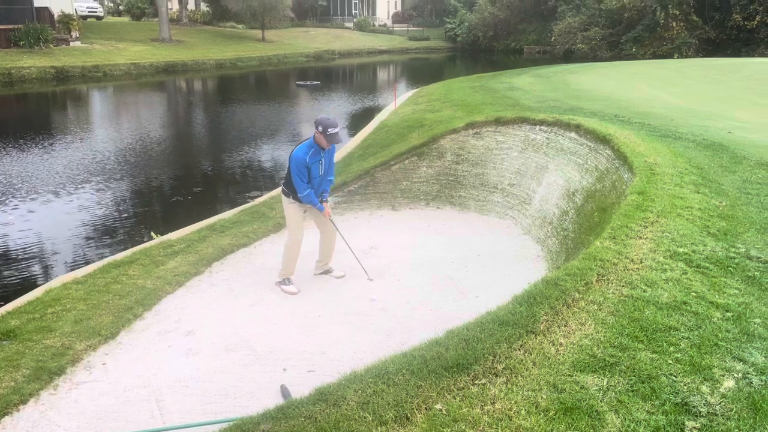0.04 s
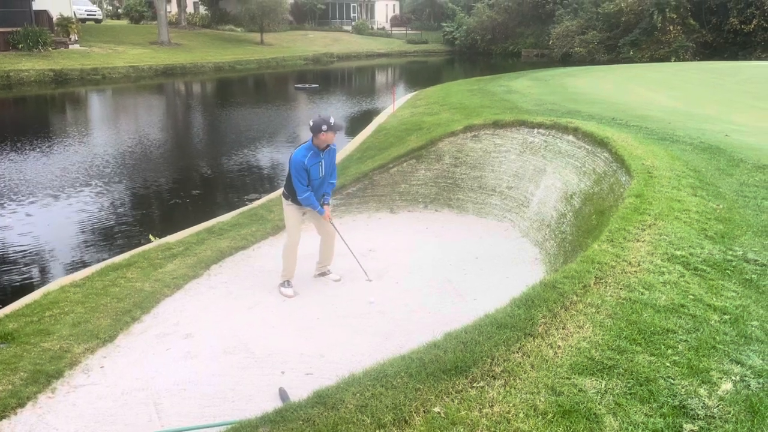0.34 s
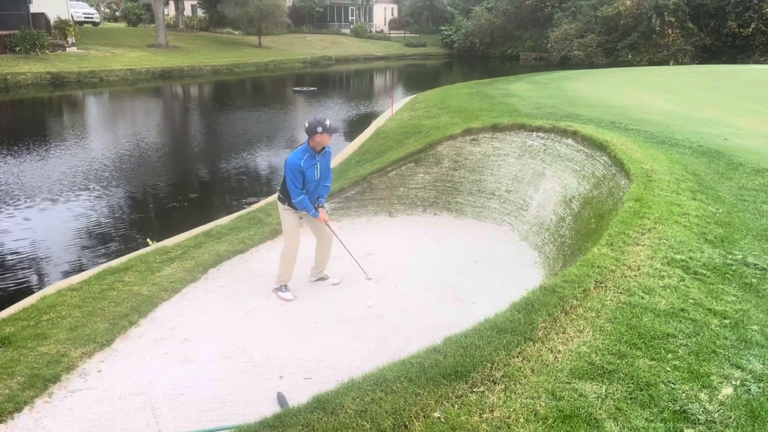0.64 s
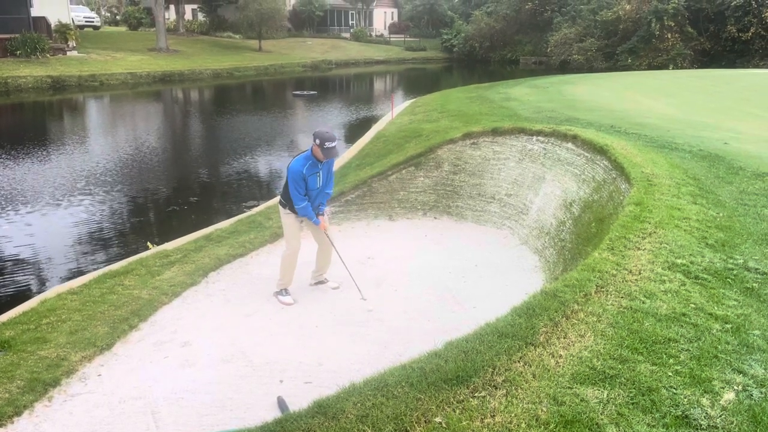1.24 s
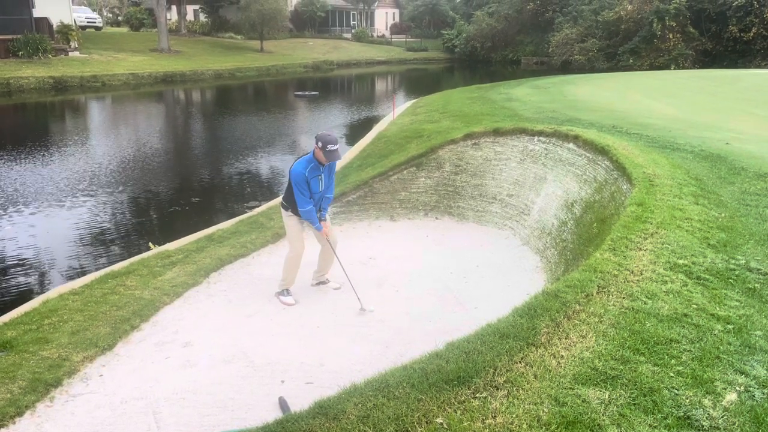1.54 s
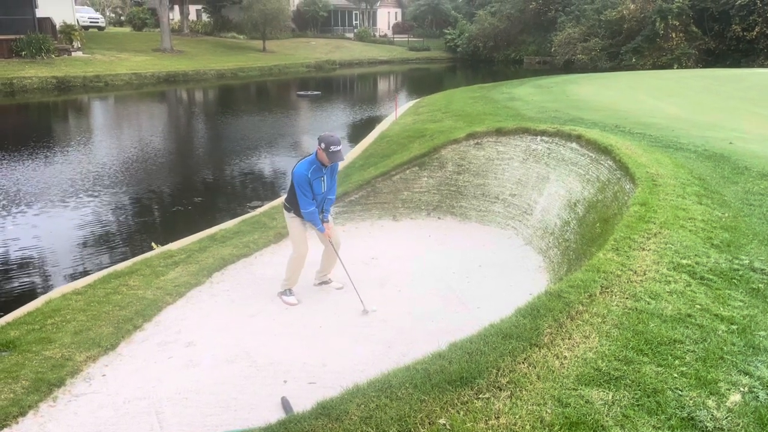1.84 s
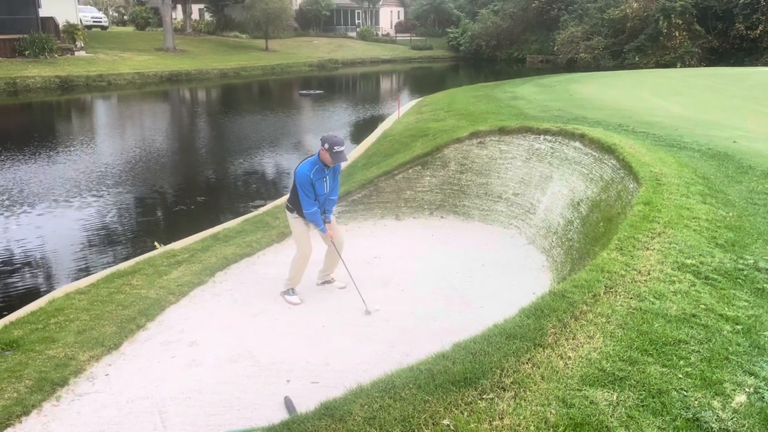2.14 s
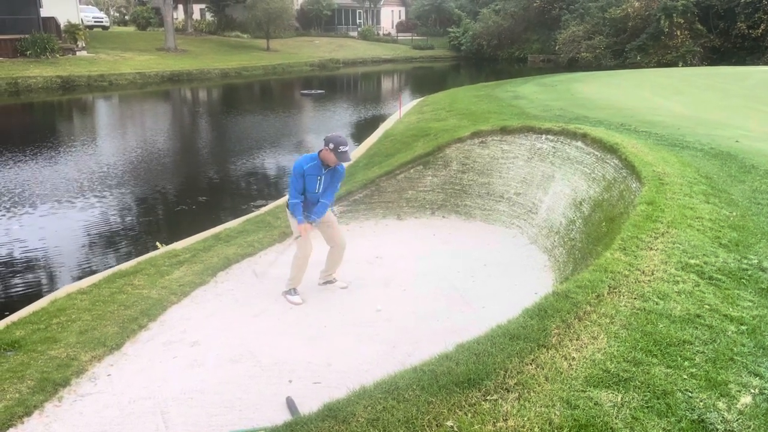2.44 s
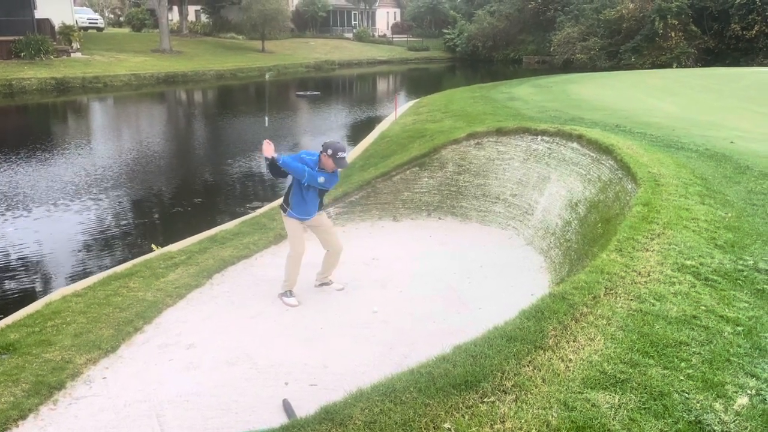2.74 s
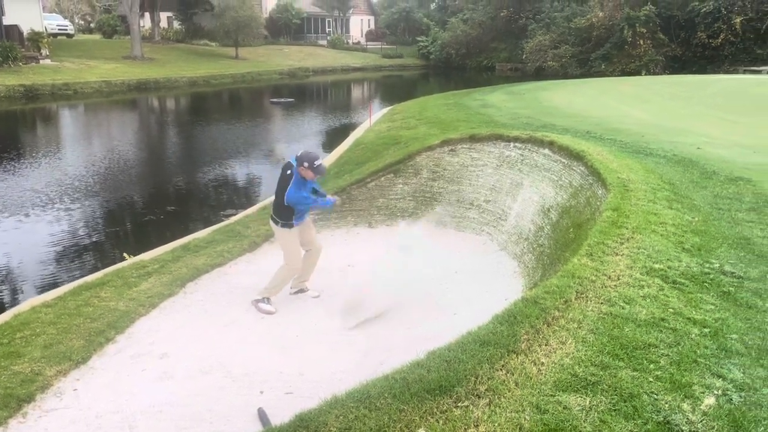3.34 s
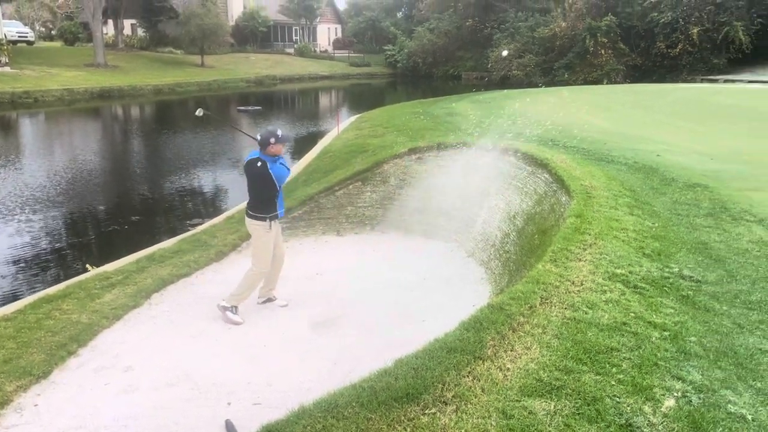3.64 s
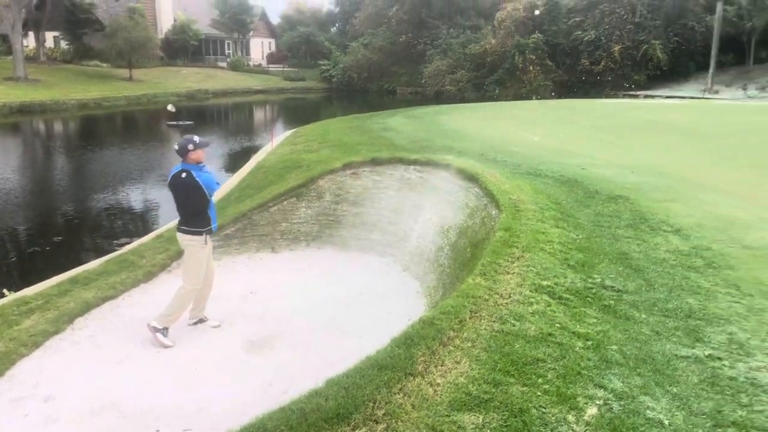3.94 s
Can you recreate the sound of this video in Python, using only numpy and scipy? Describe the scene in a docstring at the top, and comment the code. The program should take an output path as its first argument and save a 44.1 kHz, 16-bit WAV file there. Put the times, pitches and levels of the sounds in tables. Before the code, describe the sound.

A golf club strikes bunker sand once, near the end, with a sharp crack, crunch and dull thud, then a faint hiss of falling sand. Before it, a breeze bumps the microphone over distant traffic, small ticks and faint chirps.

```python
"""A golf bunker beside a pond. Far traffic and trees make a steady wash, a low drone swells, a far bird
chirps, and a breeze rumbles and bumps on the microphone. A few small ticks sound close by. The golfer's
shoes shuffle faintly, then the club cracks into the sand and crunches through it with a dull thud, and
the thrown sand hisses down. Air and cracks are shaped noise, sand is a stream of tiny random clicks,
and the clack, thud, bumps, ticks and chirps are short sine tones."""
import sys
import numpy as np
from scipy import signal
from scipy.fft import rfft, irfft
from scipy.io import wavfile

SR = 44100
rng = np.random.default_rng(int(sys.argv[2]) if len(sys.argv) > 2 else 0)


def pcm_store(signal):
    """Save signal as 16-bit PCM."""
    levels = np.round(np.clip(np.atleast_2d(signal), -1, 1) * 32767)
    wavfile.write(sys.argv[1], SR, levels.astype(np.int16).T)


N = 176400
T = np.arange(N) / SR
FREQS = np.maximum(np.fft.rfftfreq(N, 1 / SR), 1)


def from_db(db):
    """Decibels to gain."""
    return 10 ** (np.asarray(db) / 20)


def fader(rows):
    """A gain ride through points of time_s, level_db."""
    return from_db(np.interp(T, *np.transpose(rows)))


def over_hz(points):
    """Points of freq_hz, value joined along a log frequency axis."""
    hz, value = np.transpose(points)
    return np.interp(np.log(FREQS), np.log(hz), value)


def drift(rate_hz):
    """A random wobble with spread 1, mostly slower than rate_hz."""
    slow = irfft(rfft(rng.standard_normal(N)) / (1 + (FREQS / rate_hz) ** 2), N)
    return slow / slow.std()


def swell(centre_s, half_s):
    """A bell-shaped fade in and out."""
    return np.exp(-np.minimum(((T - centre_s) / half_s) ** 2 / 2, 50))


def struck(start_s, modes):
    """Decaying sines set off together, in alternating polarity."""
    age = np.clip(T - start_s, 0, 1)
    return sum((-1) ** k * from_db(db - 60 * np.minimum(age / t60, 4)) * np.sin(2 * np.pi * hz * age)
               for k, (hz, db, t60) in enumerate(modes))


# Stereo width of the noise layers: freq_hz, left_right_correlation
STEREO_WIDTH = [(60, 0.83), (250, 0.78), (500, 0.47), (900, 0.11), (1700, 0.44), (3500, 0.4), (5200, 0.49),
                (6400, -0.48), (7400, -1.026), (8000, -0.95), (9000, -0.23), (10800, 1), (12200, 0.86),
                (13800, -1)]
# Their lean to one side: freq_hz, left_minus_right_db
STEREO_PAN = [(100, -0.5), (250, -1.5), (600, 2.5), (2000, 2.5), (8000, 0)]
def coloured(white, spectrum):
    """Two unrelated white signals, as mid and side, become a stereo pair with this spectrum."""
    alike = np.clip(over_hz(STEREO_WIDTH), -1, 1)
    mid, side = rfft(white)
    sides = np.array([[1], [-1]])
    pair = np.sqrt(1 + alike) * mid + sides * np.sqrt(1 - alike) * side
    eq = from_db(over_hz(spectrum) + sides * over_hz(STEREO_PAN) / 2)
    return irfft(pair * eq, N) * np.sqrt(SR) / 2


def noise(spectrum):
    """Smooth stereo noise."""
    return coloured(rng.standard_normal((2, N)), spectrum)


def grains(per_s, spread_db, spectrum):
    """Sand grains of uneven size collide at random, one click each."""
    sizes = from_db(spread_db * np.minimum(rng.exponential(1, (2, N)), 4))
    clicks = sizes * rng.choice([-1, 1], (2, N)) * (rng.random((2, N)) < per_s / SR)
    return coloured(clicks / clicks.std(), spectrum)


# Dark tone of the background bed: freq_hz, density_db
WASH_TONE = [(20, -105), (40, -86), (65, -72.5), (200, -70.5), (400, -73.5), (530, -78.5), (660, -77),
             (850, -74), (1000, -78), (1150, -82.5), (1560, -81), (1800, -87), (2800, -94), (4000, -100),
             (6000, -106), (8500, -112), (10500, -119), (12500, -130), (15000, -150)]
# Its fader ride: time_s, gain_db
WASH_RIDE = [(0, -2), (.5, -2), (.72, -1.5), (.77, -5.5), (.82, -0.5), (.88, -1), (1.1, -0.76), (2.2, -1.5),
             (3.2, -1), (4, -1.5)]
def wash():
    """Far traffic and trees blur into a bed that barely wavers."""
    return noise(WASH_TONE) * fader(WASH_RIDE) * from_db(0.48 * drift(rate_hz=25))


# One narrow bass peak: freq_hz, density_db
DRONE_TONE = [(30, -120), (56, -74.5), (68, -51), (82, -64.5), (200, -115), (600, -170)]
# Its swell in the second half: time_s, gain_db
DRONE_RIDE = [(0, -16.5), (2.1, -12), (2.4, 0), (2.8, -1.5), (3.3, 3.5), (3.65, -4.5), (4, -15)]
def drone():
    """A deep, wavering drone far away."""
    return noise(DRONE_TONE) * fader(DRONE_RIDE)


# Partials of the call: centre_s, half_length_s, pitch_hz, relative_db
BIRD_PARTIALS = [(1.387, .008, 4480, -61), (1.386, .008, 3850, -63), (1.402, .007, 3020, -59),
                 (1.4, .011, 6100, -71), (1.655, .009, 2400, -63), (1.762, .009, 2720, -62),
                 (1.757, .009, 3300, -67)]
def bird(gain_db=6.5, fall_hz_per_s=3700, rough_rad=1.35):
    """A far bird chirps in short, slightly falling partials, roughened by phase jitter."""
    out = np.zeros((2, N))
    for s, half, hz, db in BIRD_PARTIALS:
        phase = 2 * np.pi * np.cumsum(hz - fall_hz_per_s * (T - s)) / SR
        level = from_db(gain_db + db) * swell(s, half)
        for channel in range(2):
            out[channel] += level * np.sin(phase + rough_rad * drift(rate_hz=360))
    return out


# Low end of the breeze: freq_hz, density_db
BREEZE_TONE = [(18, -103), (35, -72), (52, -56), (70, -61), (100, -59.5), (150, -68), (260, -75.5),
               (500, -90.5), (2500, -160)]
# Its gusts and lulls: time_s, gain_db
BREEZE_RIDE = [(0, -8.5), (.12, -3.5), (.3, -17), (.78, -18), (1, -8), (1.65, -6.5), (2.15, -3.5),
               (2.3, -1.5), (2.5, -3.5), (2.7, 1), (3.3, -3), (3.5, -4.5), (4, -1.5)]
# Boomy tone of a buffet of air: freq_hz, density_db
BUFFET_TONE = [(20, -88), (55, -59.5), (120, -57), (200, -67), (280, -62.5), (400, -76), (600, -101),
               (3000, -160)]
# Buffet cues: centre_s, half_length_s, gain_db
BUFFET_CUES = [(0.055, 0.035, -2.5), (0.166, 0.021, -3.5), (0.226, 0.01, -3), (0.419, 0.023, -2),
               (1.021, 0.017, -7.5), (1.277, 0.028, -6.5), (1.467, 0.0184, -4.5), (1.742, 0.011, -7),
               (1.905, 0.082, -13), (2.375, 0.035, -10)]
def wind():
    """The breeze on the microphone makes a lumpy rumble with short buffets on top."""
    rumble = noise(BREEZE_TONE) * fader(BREEZE_RIDE) * from_db(0.23 * drift(rate_hz=21))
    buffets = sum(from_db(db) * swell(s, half) for s, half, db in BUFFET_CUES)
    return rumble + noise(BUFFET_TONE) * buffets


# Soft bumps of the breeze, then two after-thumps of the club's thud: centre_s, half_length_s, pitch_hz,
# level_db
BUMP_CUES = [(0.053, 0.0017, 238, -26.5), (0.189, 0.0036, 214, -27), (0.217, 0.0032, 200, -33),
             (0.415, 0.0025, 150, -40), (0.427, 0.0052, 167, -38.5), (1.265, 0.0074, 130, -36),
             (1.297, 0.0057, 200, -38.5), (1.453, 0.0024, 150, -33.5), (1.48, 0.0046, 180, -28),
             (1.874, 0.0024, 220, -33), (1.907, 0.0026, 159, -30), (1.975, 0.0021, 250, -34.5),
             (2.249, .004, 131, -36), (3.309, 0.0062, 166, -35), (3.331, 0.0029, 153, -32.5)]
def bumps():
    """Each bump sounds for a few rounded cycles: the breeze rocks the microphone, and the last two thump after
    the thud of the shot."""
    return sum(from_db(db) * swell(s, half) * np.sin(2 * np.pi * hz * (T - s))
               for s, half, hz, db in BUMP_CUES)


# Ring of a case under a knock: pitch_hz, relative_db, t60_s
CASE_MODES = [(1540, -9, 0.0085), (4200, -6, 0.0039)]
def knock(start_s, hz, pitch_halving_s=0.00053, rise_s=0.00016, t60_s=0.013):
    """A damped pop whose pitch dives at once, with a brief ring of the case."""
    age = np.clip(T - start_s, 0, 4 * t60_s)
    phase = 2 * np.pi * hz * pitch_halving_s * np.log1p(age / pitch_halving_s)
    pop = np.sin(phase) * from_db(-60 * age / t60_s)
    return (pop + struck(start_s, CASE_MODES)) * (1 - np.exp(-age / rise_s))


# Bright snap of a tick: pitch_hz, relative_db, t60_s
SNAP_MODES = [(5570, 0, 0.0027), (8550, 1.5, 0.0021), (11700, -5.5, 0.0012)]
# Tick cues: start_s, knock_db, snap_db, left_lag_ms, knock_start_hz, lowpass_hz
TICK_CUES = [(0.7687, -25, -43, 0.082, 1880, 11400), (1.101, -32.5, -48.5, 0.15, 3200, 15000),
             (3.3238, -62, -56, 0.021, 1900, 15000), (3.788, -60, -54, 0.092, 1900, 15000),
             (3.8253, -55, -39.5, 0.2, 1900, 15000)]
def ticks():
    """Each close tick is a short knock and a snap, reaching the right side first."""
    out = np.zeros((2, N))
    for s, knock_db, snap_db, lag_ms, hz, lowpass_hz in TICK_CUES:
        lowpass = signal.butter(6, lowpass_hz, fs=SR, output="sos")
        for channel, start in enumerate((s + lag_ms / 1000, s)):
            tick = from_db(knock_db) * knock(start, hz) + from_db(snap_db) * struck(start, SNAP_MODES)
            out[channel] += signal.sosfilt(lowpass, tick)
    return out


# Thin grit under the shoes: freq_hz, density_db
SHUFFLE_TONE = [(1500, -125), (2800, -103), (4200, -101), (5500, -110), (8000, -120), (12000, -128),
                (15000, -155)]
# Two spells of footwork: time_s, gain_db
SHUFFLE_RIDE = [(0, -1.5), (.25, -0.5), (.45, -1.5), (.7, 1), (.85, -1), (1.1, -28), (1.7, -5), (2.1, -15)]
def shuffle():
    """Shoes rustle faintly in the sand as the golfer digs in his stance."""
    return grains(per_s=7500, spread_db=5, spectrum=SHUFFLE_TONE) * fader(SHUFFLE_RIDE)


# Airy hiss of sand in flight and landing: freq_hz, density_db
SPRAY_TONE = [(1500, -140), (5800, -117), (7000, -106.5), (9000, -111), (11500, -111), (13000, -116.5),
              (15000, -122)]
# Its build after the shot: time_s, gain_db
SPRAY_RIDE = [(3.27, -9), (3.3, -9), (3.48, -4.5), (3.62, -7.5), (3.8, -1), (4, 0)]
def spray(start_s):
    """Thrown sand patters down on the bank."""
    return grains(per_s=1500, spread_db=3, spectrum=SPRAY_TONE) * fader(SPRAY_RIDE) * (T > start_s)


def thud(start_s, start_hz=324, end_hz=131, sag_s=0.0069, rise_s=0.0016, t60_s=0.16, gain_db=-25.5):
    """The ground under the blade: a deep note that sinks as the sand gives way."""
    age = np.clip(T - start_s, 0, 1)
    hz = end_hz + (start_hz - end_hz) * np.exp(-age / sag_s)
    level = (1 - np.exp(-age / rise_s)) * from_db(gain_db - 60 * age / t60_s)
    return level * np.sin(2 * np.pi * np.cumsum(hz * (age > 0)) / SR)


# Broad, gritty body of the shot: freq_hz, density_db
CRUNCH_TONE = [(200, -82), (800, -77), (1800, -90), (3000, -86), (3800, -83), (5500, -88.5), (7200, -91),
               (9000, -91), (12000, -95.5), (13600, -100), (15000, -105)]
def crunch(start_s, rise_s=0.00069, hold_s=0.0063, t60_s=0.059, gain_db=-1):
    """The blade cuts through the sand in a dense burst of grains."""
    age = T - start_s
    attack = np.clip(age / rise_s, 0, 1)
    release = from_db(gain_db - 60 * np.maximum(age - hold_s, 0) / t60_s)
    return grains(per_s=14000, spread_db=2.5, spectrum=CRUNCH_TONE) * attack * release


# Hard front edge of the shot: freq_hz, density_db
CRACK_TONE = [(300, -65), (1000, -65), (1800, -77), (2700, -71), (3600, -68), (5400, -76), (7200, -82),
              (9000, -86), (11500, -79.5), (13500, -86), (15500, -97)]
# Dead clack of the blade at first contact: pitch_hz, level_db, t60_s
BLADE_MODES = [(1710, -30.5, 0.0053), (3420, -36, 0.004), (4670, -39, 0.004)]
# The club meets the sand, then the ball: start_s, relative_db, t60_s
CLUB_HITS = [(3.2646, -4, 0.0045), (3.2715, -11, 0.016)]
def bunker_shot(crack_gain_db=4, thud_delay_s=0.0024):
    """The club cracks twice over the crunch, the blade's clack and the thud, and throws up sand."""
    start_s = CLUB_HITS[0][0]
    sand = crunch(start_s)
    bursts = sum((T >= s) * from_db(db - 60 * np.clip((T - s) / t60, 0, 3)) for s, db, t60 in CLUB_HITS)
    cracks = noise(CRACK_TONE) * from_db(crack_gain_db) * bursts
    clack = struck(start_s, BLADE_MODES)
    return sand + cracks + clack + thud(start_s + thud_delay_s) + spray(start_s)


def scene():
    """All layers mixed in the open air, without echo."""
    return wash() + wind() + bumps() + shuffle() + bunker_shot() + ticks() + bird() + drone()


def record(dry, cutoff_hz=15700):
    """A steep low-pass takes off the very top."""
    return signal.sosfilt(signal.ellip(10, .1, 70, cutoff_hz, fs=SR, output="sos"), dry)


dry = scene()
out = record(dry)
pcm_store(out)
```